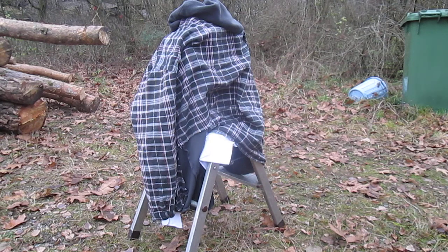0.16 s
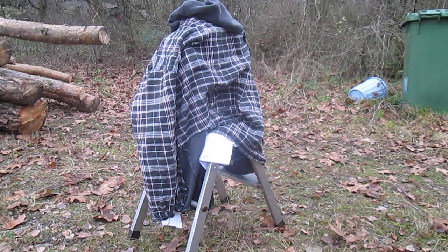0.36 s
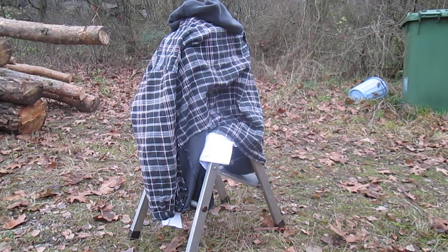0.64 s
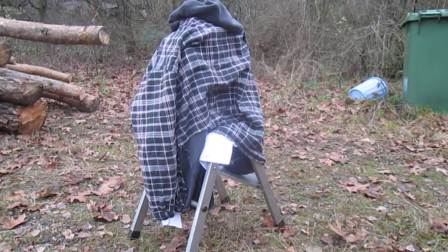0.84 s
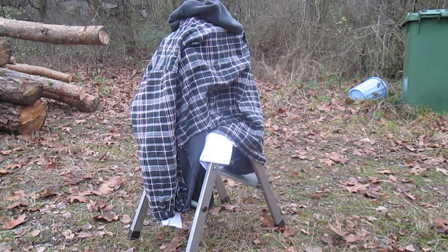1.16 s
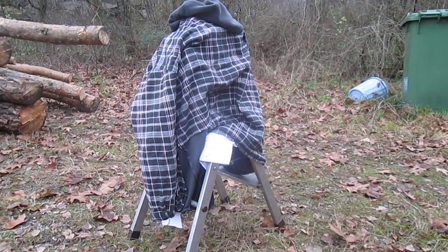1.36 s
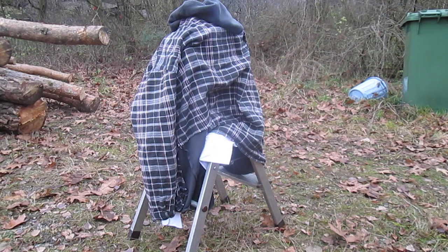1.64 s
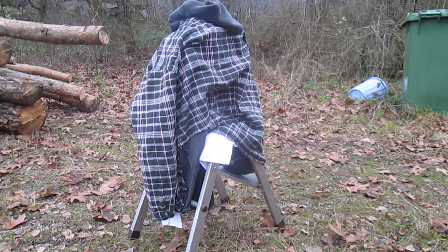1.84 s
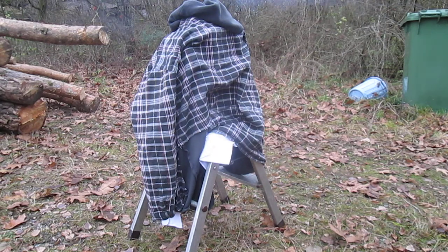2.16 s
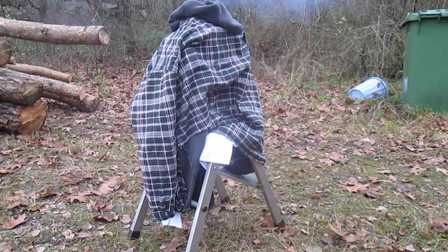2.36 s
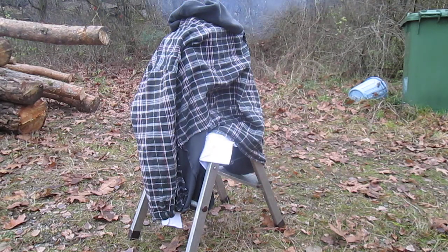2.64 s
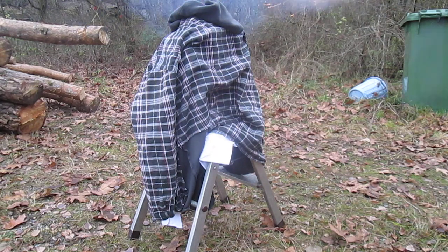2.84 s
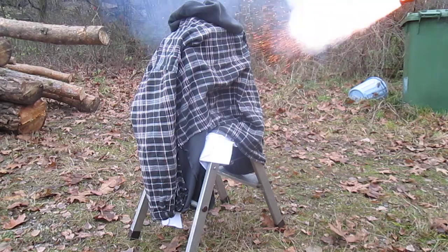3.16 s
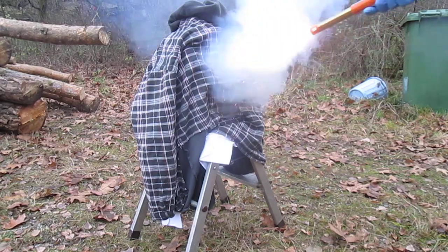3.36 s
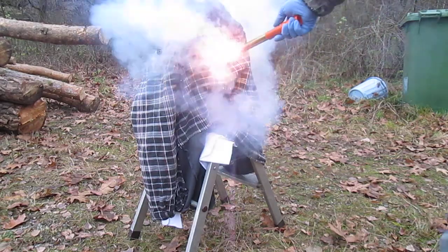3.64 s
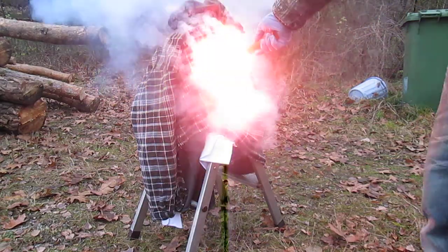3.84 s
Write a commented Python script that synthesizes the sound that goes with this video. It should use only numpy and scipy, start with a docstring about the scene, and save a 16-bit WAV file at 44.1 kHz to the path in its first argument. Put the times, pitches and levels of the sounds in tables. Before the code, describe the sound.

A hand flare cracks and fizzes, then catches with a whoosh and hisses loudly.

```python
"""Hand flare in a leafy yard

The striker cracks, the priming fizzes and spits, then the main charge catches with a whistling
whoosh and burns as a hissing, roaring jet. The flare is lowered towards a coat on a stand, so the
echo from the ground comes ever sooner and sweeps the hiss upwards."""
import sys
import numpy as np
from scipy import signal
from scipy.fft import rfft, irfft
from scipy.io import wavfile
from scipy.ndimage import map_coordinates

SR = 44100
rng = np.random.default_rng(int(sys.argv[2]) if len(sys.argv) > 2 else 0)


def unload_audio(sound):
    """Save the sound as a 16-bit wav file, at the path given as the first command line argument."""
    columns = np.transpose(np.atleast_2d(sound))
    # keep every value between -1 and 1, then stretch to whole-number steps
    steps = np.round(np.clip(columns, -1, 1) * 32767)
    wavfile.write(sys.argv[1], SR, steps.astype(np.int16))


N = 176400
T = np.arange(N) / SR
HZ = np.maximum(np.arange(N // 2 + 1) * SR / N, 1)


def from_db(db):
    """Decibels to gain."""
    return 10 ** (np.asarray(db) / 20)


def rms_one(x):
    """Scale to unit rms."""
    return x / np.sqrt(np.mean(x ** 2) + 1e-20)


def in_time(rows):
    """Each column of an envelope table at every sample."""
    times, *columns = np.transpose(rows)
    return [np.interp(T, times, column) for column in columns]


def over_hz(points):
    """A frequency curve at every FFT bin."""
    hz, value = np.transpose(points)
    return np.interp(np.log(HZ), np.log(hz), value)


def colour(x, spectrum):
    """Minimum-phase EQ: nothing rings ahead of an attack."""
    cepstrum = irfft(np.log(from_db(over_hz(spectrum))), N)
    cepstrum[1:N // 2] *= 2
    cepstrum[N // 2 + 1:] = 0
    return irfft(rfft(x) * np.exp(rfft(cepstrum)), N)


def drift(rate_hz):
    """Random modulation, mostly slower than rate_hz; rms 1."""
    return rms_one(irfft(rfft(rng.standard_normal(N)) / (1 + (HZ / rate_hz) ** 2), N))


def turbulence(spectrum, flutter_db, rate_hz):
    """Gas noise whose strength flutters at random; rms 1."""
    return rms_one(colour(rng.standard_normal(N) * from_db(flutter_db * drift(rate_hz)), spectrum))


def grains(spectrum, per_s, spread_db=4.5):
    """Random tiny bursts, mostly weak, a few strong; rms 1."""
    sizes = from_db(spread_db * np.minimum(rng.exponential(1, N), 4.5))
    signs = rng.choice([-1, 1], N)
    fires = rng.random(N) < per_s / SR
    return rms_one(colour(sizes * signs * fires, spectrum))


def delayed(x, lag_ms):
    """A gliding delay line."""
    return map_coordinates(x, [np.arange(N) - lag_ms * SR / 1000], order=3)


# Envelope of the main burn: time_s, hiss_db, roar_db, hiss_centre_hz
FLAME_ENVELOPE = [(2.86, -90, -92, 4587), (2.91, -26, -29, 4418), (2.97, -27, -30.5, 4208),
                  (3.05, -24, -27.5, 4082), (3.31, -25.5, -28, 3978), (3.40, -25, -28, 4245),
                  (3.49, -22.5, -32.5, 4350), (3.55, -25.5, -33, 4353), (3.61, -23.5, -31, 4488),
                  (3.72, -23, -48, 4594), (3.748, -23.5, -49, 4640), (3.775, -28, -51, 4640),
                  (3.80, -22.5, -49, 4400), (3.85, -24.5, -54, 4510), (3.875, -25.5, -52, 4544),
                  (3.94, -28.5, -51, 4716), (4.0, -25, -52, 4730)]
# Tone of the jet's hiss before it is swept: freq_hz, relative_db
JET_TONE = [(200, -44), (450, -27.5), (1200, -42), (2000, -21.5), (3000, -11.5), (3800, 0), (4500, 2.5),
            (5150, -1), (5700, -6), (7000, -20.5), (8500, -25.5), (11000, -37), (15000, -58)]
# Tone of the broad roar under the hiss: freq_hz, relative_db
ROAR_TONE = [(40, -41), (120, -18), (200, -10.5), (330, -7), (450, -4), (700, -3), (1150, -1.5), (1600, -3),
             (2100, 0), (3000, -2.5), (4200, -2), (6000, -6), (9000, -34.5), (15000, -61)]
# Bright tone of the flame's sparks and of the ignition's rush: freq_hz, relative_db
RUSH_TONE = [(30, -10.5), (200, -13.5), (700, -7.5), (2000, -5.5), (3000, -2), (4000, 1), (5200, 2.5),
             (6000, -4), (7000, -12), (8500, -15), (11000, -25), (15000, -48)]


def flame(unswept_centre_hz=4474):
    """The jet's hiss dips, then climbs in pitch while its roar dies away; sparks crackle in it."""
    hiss_db, roar_db, centre_hz = in_time(FLAME_ENVELOPE)
    jet = turbulence(JET_TONE, flutter_db=1.14, rate_hz=45)
    playhead = np.cumsum(centre_hz / unswept_centre_hz)  # varispeed moves the whole band
    hiss = map_coordinates(jet, [playhead], order=5, mode="wrap")
    sparks = from_db(-20) * grains(RUSH_TONE, per_s=500)
    roar = turbulence(ROAR_TONE, flutter_db=1.5, rate_hz=87)
    return from_db(hiss_db + 0.2) * (hiss + sparks) + from_db(roar_db + 0.9) * roar


# Envelope of the charge catching: time_s, rush_db, thump_db, whistle_db
IGNITION_ENVELOPE = [(2.815, -53, -75, -80), (2.842, -21.5, -43, -53), (2.862, -17.5, -39, -26),
                     (2.884, -18, -30, -15), (2.89, -15, -28, -26), (2.909, -15, -25, -38),
                     (2.92, -22, -50, -48), (2.96, -52, -75, -80)]
# Tone of the thump that gives it weight: freq_hz, relative_db
THUMP_TONE = [(25, -3), (50, 5), (90, -10), (150, 9), (220, -4), (700, 1), (2000, -4.5), (5000, -29),
              (15000, -58)]


def ignition(whistle_hz=5190, waver_hz=126.5):
    """Gas bursts from the mouth of the tube with a thump and a wavering whistle."""
    rush_db, thump_db, whistle_db = in_time(IGNITION_ENVELOPE)
    phase = 2 * np.pi * np.cumsum(whistle_hz + waver_hz * drift(rate_hz=94)) / SR
    whistle = rms_one(np.sin(phase) * (1 + .3 * drift(rate_hz=360)))
    rush = turbulence(RUSH_TONE, flutter_db=.8, rate_hz=200)
    thump = turbulence(THUMP_TONE, flutter_db=1.2, rate_hz=80)
    return from_db(rush_db) * rush + from_db(thump_db) * thump + from_db(whistle_db) * whistle


# Envelope of the burning priming: time_s, level_db
PRIMING_ENVELOPE = [(.265, -78), (.285, -31.5), (.33, -40), (.413, -40.5), (.423, -68), (.47, -64),
                    (.5, -78), (.54, -71), (.58, -43.5), (.63, -49), (.675, -37), (.70, -50), (.75, -35),
                    (.87, -34.5), (.95, -30), (1.21, -28), (1.27, -31.5), (1.42, -25), (1.72, -25.5),
                    (1.85, -22.5), (1.93, -31.5), (1.99, -26.5), (2.04, -34.5), (2.11, -29), (2.2, -24.5),
                    (2.26, -29), (2.30, -25.5), (2.36, -34), (2.42, -29), (2.52, -32), (2.61, -26),
                    (2.71, -28), (2.78, -25), (2.82, -27), (2.9, -20), (2.95, -85)]
# Tone of its thin fizz: freq_hz, relative_db
FIZZ_TONE = [(100, -40), (350, -50), (700, -22), (1200, -19), (2000, -15), (3000, -9), (4000, -4),
             (5200, 0.5), (6000, -2), (7000, -8), (8500, -22.5), (11000, -36.5), (15000, -48.5)]
# Crisp tone of its sparks, spits and cracks: freq_hz, relative_db
CRACKLE_TONE = [(100, -18.5), (350, -12), (1000, -14.5), (2000, -7), (3000, -7), (4500, 3.5), (5500, 2.5),
                (7000, -3.5), (9000, -22.5), (15000, -65)]
# Dull tone of its pops and puffs: freq_hz, relative_db
PUFF_TONE = [(30, -17), (80, -4), (150, 2.5), (220, -3.5), (330, -5.5), (480, 1.5), (700, 2.5),
             (1500, -3.5), (3000, -6), (6000, -47), (15000, -79)]


def priming():
    """The priming fizzes; sparks and tiny low pops ride the same envelope."""
    level_db, = in_time(PRIMING_ENVELOPE)
    fizz = turbulence(FIZZ_TONE, flutter_db=1.2, rate_hz=60)
    sparks = from_db(-10) * grains(CRACKLE_TONE, per_s=500)
    pops = from_db(-34.5) * grains(PUFF_TONE, per_s=130)
    return from_db(level_db - 1.28) * (fizz + sparks + pops)


# Hits of the striker and of sparks: start_s, level_db, t60_s, ring_hz, ring_relative_db
CRACK_HITS = [(.0755, -25.5, 0.0093, 4650, -6), (0.086, -37, 0.017, 5200, -6),
              (0.1657, -39.5, .006, 2520, 6), (0.1976, -27.5, 0.0037, 4900, -12),
              (.238, -36, .005, 5000, -6), (0.2687, -32, .03, 4000, 0), (0.2735, -15.5, 0.0039, 3940, 8),
              (0.2788, -14.5, 0.0088, 4400, 1), (0.2856, -15.5, 0.073, 1900, -21.5),
              (0.3094, -16.5, 0.014, 4830, -1), (.786, -26, 0.0069, 2400, -1), (.898, -39, .012, 450, 9),
              (.945, -14, 0.0087, 1740, -10), (1.023, -29, .016, 426, 2), (1.2256, -12, 0.014, 4950, -6),
              (1.239, -17, 0.0083, 3800, 0), (1.394, -13.5, 0.006, 1110, -17),
              (1.9031, -8.5, 0.0026, 4500, -9), (2.623, -16.5, .004, 5000, -11),
              (2.74, -14, .003, 5000, -10), (2.794, -17, 0.0064, 4500, -12),
              (2.827, -14, 0.0052, 2200, -10), (2.961, -10, 0.0019, 4000, -6)]


def cracks(ring_width=0.4):
    """Each crack is a fast-dying noise burst with a short ring, ring_width times its pitch wide."""
    snaps, rings = np.zeros(N), np.zeros(N)
    t = T[:SR // 10]
    for start_s, level_db, t60_s, ring_hz, ring_db in CRACK_HITS:
        start = int(start_s * SR)
        burst = from_db(level_db - 4.5 - 60 * t / t60_s) * rng.choice([-1, 1], len(t))
        b, a = signal.iirpeak(ring_hz, 1 / ring_width, fs=SR)
        ring = signal.lfilter(b, a, signal.lfilter(b, a, burst))
        makeup_gain = np.sqrt(SR / (2 * ring_hz * ring_width))
        snaps[start:start + len(t)] += burst
        rings[start:start + len(t)] += from_db(ring_db) * ring * makeup_gain
    eq_gain = np.sqrt(np.mean(from_db(over_hz(CRACKLE_TONE)) ** 2))
    return colour(snaps, CRACKLE_TONE) / eq_gain + rings


# Spits of the priming: centre_s, length_s, hiss_db, puff_db
SPIT_SWELLS = [(1.15, 0.0084, -24, -48), (1.391, 0.0055, -28, -37.5), (1.589, 0.0037, -37, -44),
               (1.663, 0.017, -29, -45.5), (1.877, 0.0059, -25.5, -46), (2.003, 0.012, -21.5, -48.5),
               (2.114, .008, -37, -46), (2.22, 0.014, -35, -38.5), (2.314, .02, -23, -35.5),
               (2.446, 0.015, -22.5, -34.5), (2.677, 0.006, -21, -27.5), (2.793, .006, -20.5, -38)]


def spits():
    """Short swells of gas, each a rough hiss over a low puff."""
    hiss_gain, puff_gain = np.zeros(N), np.zeros(N)
    for centre_s, length_s, hiss_db, puff_db in SPIT_SWELLS:
        swell = np.exp(-2 * ((T - centre_s) / length_s) ** 2)
        hiss_gain += from_db(hiss_db) * swell
        puff_gain += from_db(puff_db) * swell
    hiss = turbulence(CRACKLE_TONE, flutter_db=3.6, rate_hz=580)
    puff = turbulence(PUFF_TONE, flutter_db=6.0, rate_hz=143)
    return hiss_gain * hiss + puff_gain * puff


# Delay of the bounce off the ground: time_s, lag_ms
GROUND_DELAY = [(0.35, 3.492), (0.6, 3.6), (1, 3.203), (1.3, 3.158), (1.55, 2.99), (2.1, 2.939),
                (2.75, 2.883), (3.1, 2.857), (3.28, 2.761), (3.45, 2.548), (3.65, 2.321), (3.8, 2.049),
                (3.93, 2.015)]
# EQ of that bounce at its closest: freq_hz, gain_db
GROUND_EQ = [(200, -9), (1000, -6.5), (3000, -9), (5500, -9), (10000, -16)]


def ground_echo(flare):
    """The bounce comes sooner and louder as the flare is lowered: a rising comb sweep in the mix."""
    lag_ms, = in_time(GROUND_DELAY)
    closeness = np.sqrt(lag_ms.min() / lag_ms)
    return closeness * delayed(colour(flare, GROUND_EQ), lag_ms)


# Close reflection by the coat: time_s, lag_ms, gain
COAT_REFLECTION = [(3.2, 1.4, 0), (3.45, 1.31, .13), (3.62, 1.23, .16), (3.8, .92, .3), (3.93, .83, .42),
                   (4, .82, .42)]


def coat_echo(flare):
    """A second, inverted echo grows as the flare nears the coat."""
    lag_ms, gain = in_time(COAT_REFLECTION)
    return -gain * delayed(flare, lag_ms)


def scatter(x, t60_s):
    """Diffuse dying reflections from leaves, logs and bushes, with unit gain."""
    tail = rng.standard_normal(SR // 2) * from_db(-60 * T[:SR // 2] / t60_s)
    return signal.fftconvolve(x, tail / np.sqrt(np.sum(tail ** 2)))[:N]


# Background level under the recorder's automatic gain, as a drawn curve: time_s, level_db
AUTO_GAIN_DUCKING = [(0, -49.5), (.29, -46), (.34, -59.5), (.52, -59.5), (.72, -53), (1.0, -45.5),
                     (1.5, -60), (2.0, -71), (2.6, -54.5), (4, -67)]
# Tone of the yard's rustle and rumble: freq_hz, relative_db
YARD_TONE = [(20, 3), (60, 6), (130, 1), (300, -2), (800, -1), (1150, -1), (2000, -12), (2800, -17),
             (5000, -13), (7000, -25), (9000, -31), (15000, -42)]


def ducked_background():
    """Faint rustle and rumble: ducked at the first loud cracks, back up, ducked as the hiss grows."""
    level_db, = in_time(AUTO_GAIN_DUCKING)
    return from_db(level_db) * turbulence(YARD_TONE, flutter_db=2, rate_hz=7.7)


# EQ of the diffuse side signal, widest in the treble: freq_hz, gain_db
SIDE_EQ = [(100, -50), (500, -44), (1000, -36), (2000, -27), (4500, -23), (8000, -13), (12000, -7)]
# Phase between the two ports: freq_hz, left_lead_rad
PORT_LEAD = [(1000, 0), (1700, -.05), (2500, -.22), (3500, -.32), (5200, -.46), (8000, -.72), (11000, -1),
             (15000, -1.1)]


def mic_ports(mid, hiss_db=-68):
    """Two closely spaced ports hear the scene slightly out of step, each with a faint hiss."""
    side = colour(scatter(mid, t60_s=.15), SIDE_EQ)
    sign = np.array([[1], [-1]])  # left, right
    phase_shift = np.exp(.5j * sign * over_hz(PORT_LEAD))
    stereo = irfft(rfft(mid + sign * side) * phase_shift, N)
    return stereo + from_db(hiss_db) * rng.standard_normal((2, N))


def scene():
    """The flare and its echoes over the ducked background, in stereo."""
    flare = priming() + spits() + cracks() + ignition() + flame()
    echoes = ground_echo(flare) + coat_echo(flare)
    reverb = from_db(-14) * scatter(flare, t60_s=.16)
    return mic_ports(flare + echoes + reverb + ducked_background())


# Narrow resonances of the microphone: centre_hz, width_hz, boost_db
MIC_RESONANCES = [(1062, 41, 1.5), (2766, 45, 2.5), (5110, 360, 2), (6700, 18, 0)]


def record(dry, cutoff_hz=15850, dc_offset=-.0123):
    """Peaks are rounded, the microphone rings faintly, the top is cut and the converter adds DC."""
    rounded = 0.64 * np.tanh(dry / 0.67)
    boost_db = sum(db / (1 + (2 * (HZ - hz) / width) ** 2) for hz, width, db in MIC_RESONANCES)
    top_cut = 1 / np.sqrt(1 + (HZ / cutoff_hz) ** 200)
    return irfft(rfft(rounded) * from_db(boost_db) * top_cut, N) + dc_offset


dry = scene()
out = record(dry)
unload_audio(out)
```